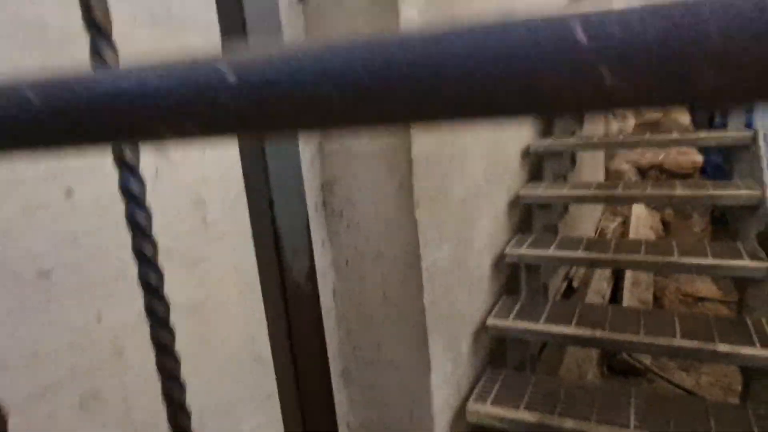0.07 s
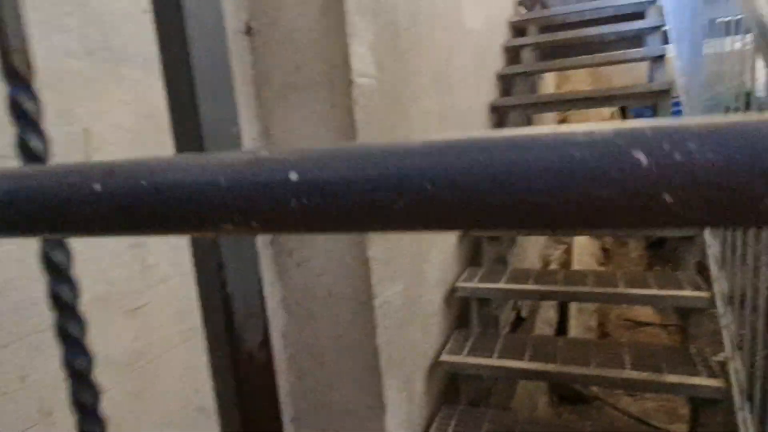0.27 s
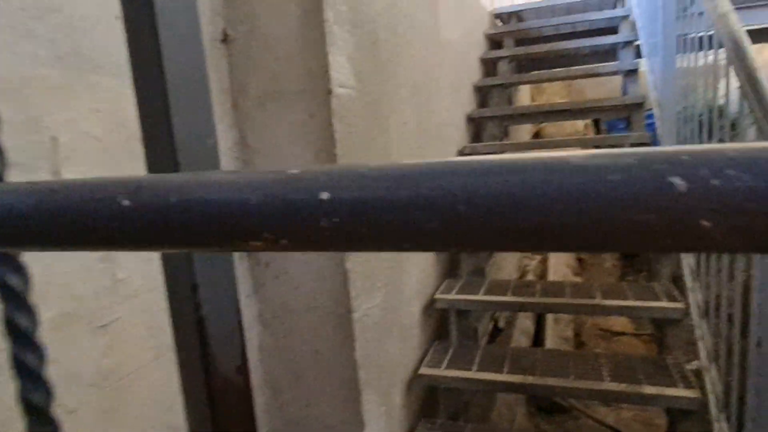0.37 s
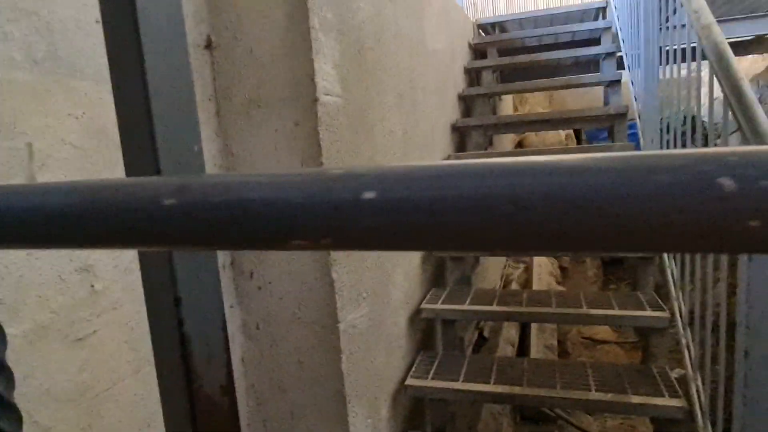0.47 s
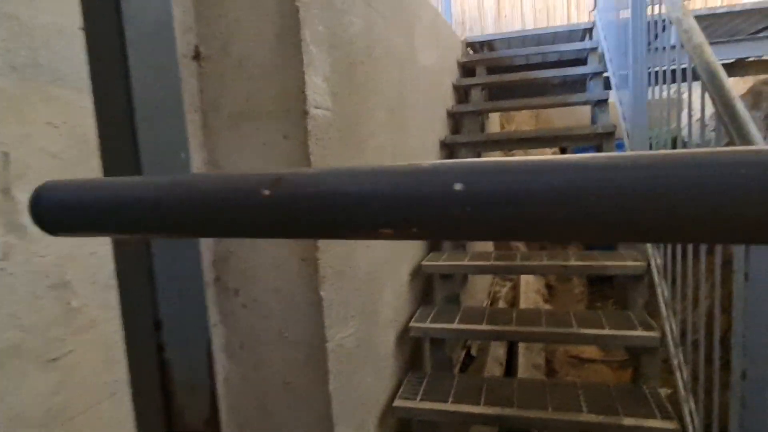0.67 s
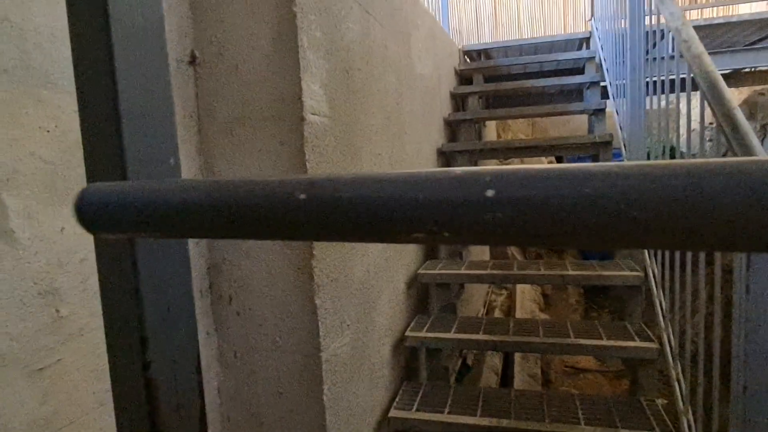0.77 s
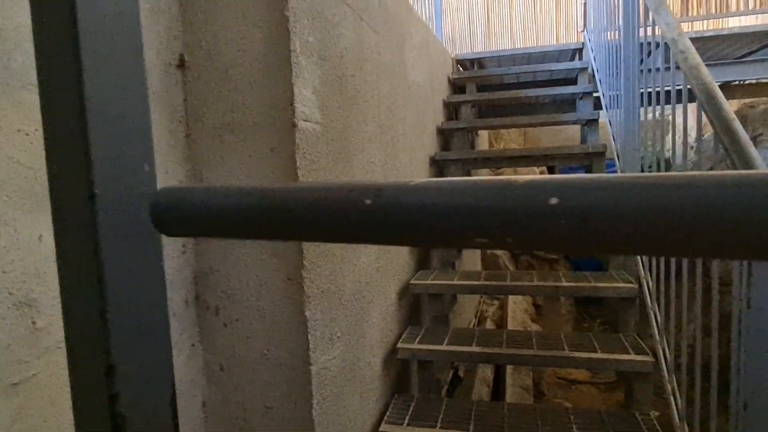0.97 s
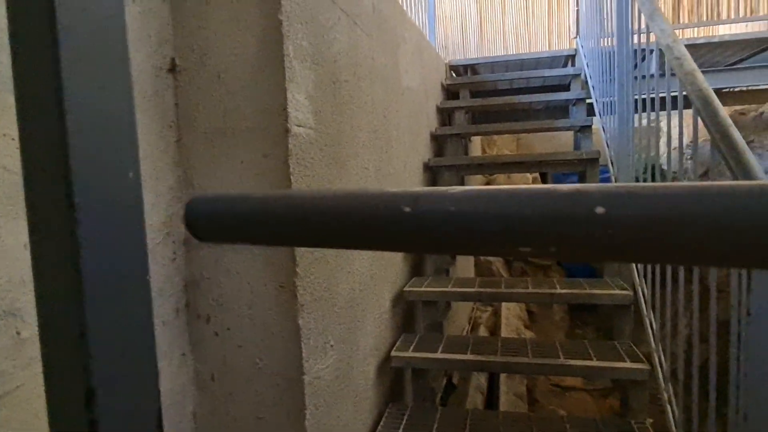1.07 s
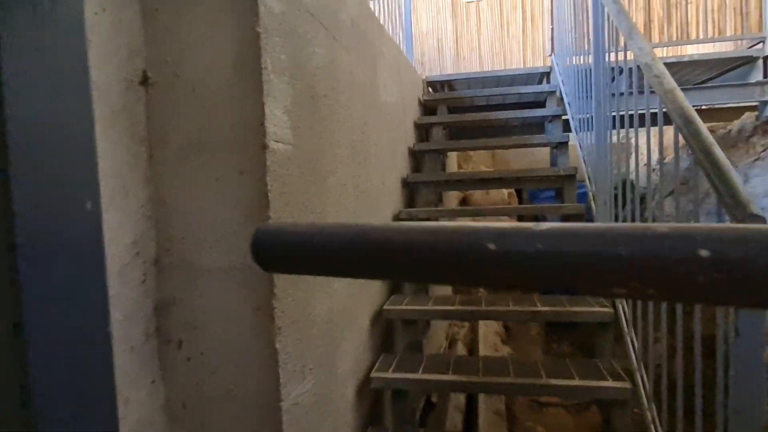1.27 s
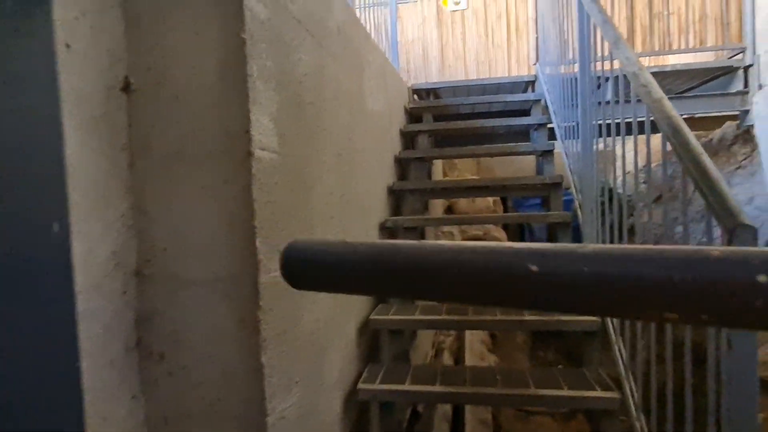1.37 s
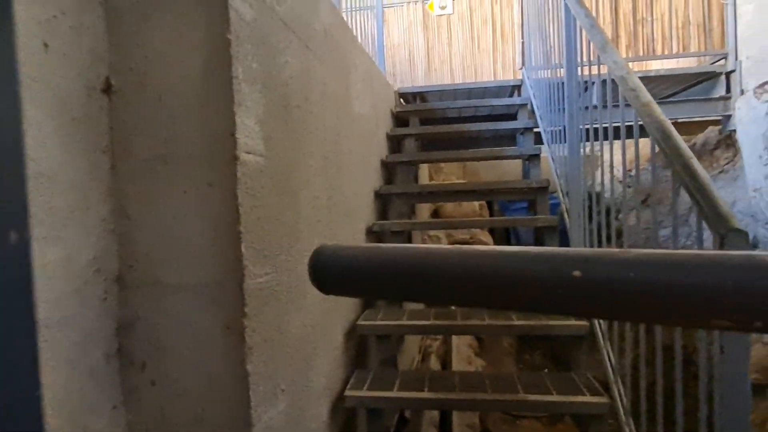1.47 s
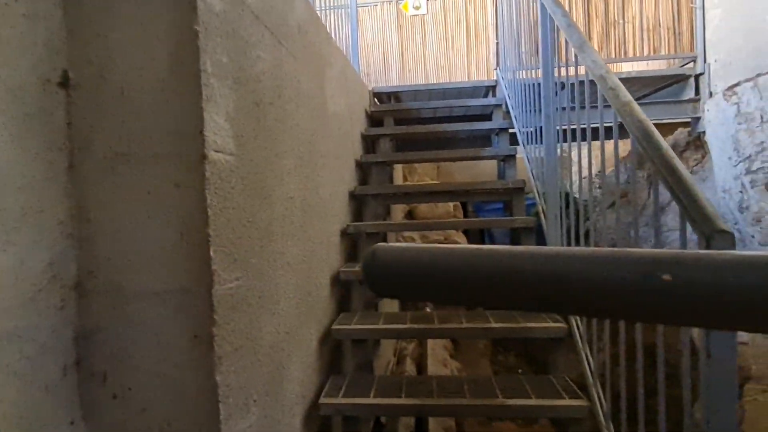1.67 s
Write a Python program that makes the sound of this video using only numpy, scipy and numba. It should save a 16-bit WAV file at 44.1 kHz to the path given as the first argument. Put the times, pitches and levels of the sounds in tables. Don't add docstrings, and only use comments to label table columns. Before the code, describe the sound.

Metallic footsteps on grated steel stairs. A previous step's thin ring is fading at the start; at about 0.2 s a shoe lands with a sharp clank, brief grating rattle and dense bright ringing, decaying over roughly a second. A second, similar clang with slightly different notes comes at 1.05 s. Concrete walls blur the tails; faint scuffs, including one near 1.25 s, soft wind bumps and low outdoor hum lie beneath.

```python
import sys
import numpy as np
from scipy import signal
from scipy.io import wavfile
from scipy.ndimage import uniform_filter1d
from numba import njit

SR = 44100
rng = np.random.default_rng(int(sys.argv[2]) if len(sys.argv) > 2 else 0)


def convert_level_to_amplitude(level_db):
    exponent = np.asarray(level_db, float) / 20
    return 10 ** exponent


def generate_wav(sig):
    pcm = np.round(np.clip(np.atleast_2d(sig).T, -1, 1) * 32767).astype(np.int16)
    wavfile.write(sys.argv[1], SR, pcm)


N = 74970

# start_s, level_db, rattle_hold_s, tread_number
LANDINGS = [
    (-.65, -8.5, 0.034, 2),
    (.1975, -14.5, 0.051, 0),
    (1.0465, -14.5, .055, 1),
]
# pitch_hz, left_db, right_db, ring_t60_s
FRAME_A = [(218, -62, -63, 2.0), (249, -56, -58, 2.0), (307, -46, -43, 1.6), (396, -45, -42, 1.4),
           (503, -41, -35, .75), (589, -49, -50, 2.0), (695, -38, -32, .8), (881, -42, -46, 2.0),
           (1244, -31, -27, 0.74), (1290, -38, -35, .8), (1382, -28, -20, 0.74), (1567, -20, -21, 0.68),
           (1651, -49, -48, 2.0), (1686, -33, -30, .9)]
FRAME_B = [(254, -54, -54, 2.0), (308, -51, -48, 2.0), (349, -57, -56, 2.0), (391, -46, -45, 2.0),
           (565, -42, -38, 1.0), (742, -51, -54, 2.0), (943, -49, -44, 2.0), (1610, -30, -28, .6),
           (1330, -27, -25, .3), (1245, -28, -29, .6), (1312, -33, -40, 1.61), (1420, -18, -14, .58),
           (1494, -29, -30, 0.79), (1585, -26, -28, 0.66)]
# pitch_hz, left_db, right_db, ring_t60_s
FRAME_C = [(285, -52, -49, 2.0), (307, -48, -45, 2.0), (490, -51, -49, 2.0), (587, -46, -44, 2.0),
           (637, -52, -50, 2.0), (803, -49, -47, 2.0), (1567, -51, -49, 2.0), (1663, -46, -43, 2.0),
           (4560, -62, -62, 2.0)]
BARS_C = [(1917, -39, -36, 2.0), (1944, -40, -37, 2.0), (1997, -49, -46, 2.0), (2100, -52, -47, 2.0),
          (2153, -53, -50, 2.0), (2638, -56, -52, 2.0), (2724, -53, -50, 2.0), (2912, -50, -45, 2.0),
          (2982, -46, -43, 2.0), (3015, -40, -37, 2.0), (3060, -47, -44, 2.0), (3101, -46, -43, 2.0),
          (3203, -58, -55, 2.0)]
# pitch_hz, left_db, right_db, ring_t60_s
BARS_A = [(1759, -33, -31, 1.26), (1834, -42, -29, .68), (1894, -48, -36, 1.46), (1945, -37, -32, 1.6),
          (1916, -45, -41, 2.0), (2095, -38, -31, 1.0), (2151, -31, -23, 1.2), (2258, -25, -16, .5),
          (2658, -38, -30, .88), (2776, -35, -39, 1.15), (2859, -28, -32, 0.89), (2982, -37, -37, 1.5),
          (3016, -38, -32, 1.33), (3073, -35, -31, 1.33)]
BARS_B = [(1780, -40, -36, 1.54), (1918, -45, -37, 2.0), (2011, -43, -42, 2.0), (2020, -40, -40, 1.4),
          (2100, -37, -22, 0.62), (2151, -38, -28, 1.1), (2248, -25, -23, .6), (2522, -32, -23, 0.58),
          (2777, -41, -32, 1.2), (2818, -36, -29, 1.4), (2859, -36, -30, 0.91), (2921, -28, -27, 0.71),
          (3017, -39, -36, 1.74), (3105, -32, -32, 1.04)]
# pitch_hz, left_db, right_db, ring_t60_s
BRACES_A = [(2606, -49, -45, 2.0), (2633, -41, -32, .9), (2818, -41, -36, 2.0), (4011, -26, -26, .26),
            (2522, -33, -29, .7), (4743, -26, -25, .45), (5752, -25, -25, .36), (5938, -26, -26, .42),
            (5981, -27, -27, .4), (6099, -31, -31, .55), (6481, -35, -35, .5), (4560, -42, -42, .8)]
BRACES_B = [(398, -38, -36, .35), (479, -34, -33, .2), (670, -30, -28, .15), (990, -25, -28, .16),
            (1015, -40, -36, .8), (1686, -30, -28, .8), (2213, -30, -28, .5), (2633, -33, -26, .6),
            (3030, -36, -33, 1.0), (4565, -37, -37, .75), (4899, -34, -34, .5), (5394, -31, -31, .36),
            (6029, -31, -31, .43), (6132, -28, -28, .3)]
RODS_HZ = [2372, 6289, 6810, 7150, 7355, 7387, 7443, 7482, 7698, 7786, 7870, 8003, 8104]
RODS_DB = [-21.5, -20, -27.5, -35.5, -26.5, -26, -24, -28.5, -26.5, -37, -34.5, -34.5, -42.5]
RODS_T60_S = [.3, .4, .2, .3, .28, .3, .25, .22, .55, .35, .35, .3, .3]
# pitch_hz, level_db
CROWD_LOW = [(180, -39), (650, -17), (1400, -4.5), (2300, -6), (3100, -8.5), (3400, -9.5), (6000, -8.5),
             (6900, -7), (7600, -1)]
CROWD_HIGH = [(7600, -0.5), (8120, -6.5), (8300, -22), (8900, -12.5), (10000, -21), (11500, -11),
              (13000, -22.5), (14600, -11)]
# pitch_hz, ring_t60_s
RING_LOW = [(200, 2), (700, 1.12), (1300, 0.75), (1950, 0.85), (2450, 0.54), (3050, 1.17), (3300, 0.55),
            (4600, 0.49)]
RING_HIGH = [(4600, 0.41), (5600, 0.37), (7800, 0.32), (8500, 0.29), (16000, 0.15)]
# pitch_hz, left_minus_right_db
STEEL_PAN = [(200, -2), (600, 0), (2000, -5), (5000, 0.5), (7500, -8), (16000, 1)]
# pitch_hz, level_db
HUM = [(30, -27.5), (55, -19.5), (85, -16.5), (200, -12.5), (310, -2), (480, -10), (1000, -19), (2000, -19)]
# pitch_hz, side_share
HUM_SIDE = [(40, 0.62), (70, .45), (110, .1), (320, 0.15), (600, 1)]
# pitch_hz, left_minus_right_db
HUM_PAN = [(55, -11.5), (110, 0.5), (300, -2.0)]
# start_s (moment of the peak), level_db, rise_s (before it), fall_s (after it)
SCUFFS = [
    (.065, -68, 0.029, 0.021),
    (.18, -55.5, .015, 0.082),
    (.51, -62, 0.011, 0.024),
    (.95, -59, .012, 0.029),
    (1.25, -52.5, .015, 0.012),
    (1.47, -66, .015, 0.038),
    (1.63, -58, 0.028, .04),
]
# start_s (moment of the peak), level_db, length_s (rise and fall alike), pitch_hz
BUMPS = [
    (.44, -61, .07, 45),
    (1.15, -62, .08, 50),
    (1.655, -57, .04, 56),
    (.99, -58, .015, 330),
]

RING_LENGTH = int(2.4 * SR)
LAG_S = 0.000407


def curve(table, hz):
    points = np.array(table)
    return np.interp(np.log(hz), np.log(points[:, 0]), points[:, 1])


def two_part(low, high, hz):
    return np.where(hz < high[0][0], curve(low, hz), curve(high, hz))


def band(x, hz, width_hz):
    return signal.lfilter(*signal.iirpeak(min(hz, .45 * SR), hz / width_hz, fs=SR), x)


def unit(x):
    return x / np.sqrt(np.mean(x ** 2))


@njit
def ring(hz, t60, left, right, start, length):
    out = np.zeros((2, length))
    for m in range(len(hz)):
        turn = np.exp(2j * np.pi * hz[m] / SR - np.log(1000) / (t60[m] * SR))
        z = 1. + 0j
        for i in range(start[m], min(length, int(1.2 * t60[m] * SR) + start[m])):
            out[0, i] += (left[m] * z).imag
            out[1, i] += (right[m] * z).imag
            z *= turn
    return out


def two_microphones(hz, db, pan_db, alike, luck):
    alike = np.clip(alike, 0, 1)
    shared, other = np.exp(2j * np.pi * luck[:, 0]), np.exp(2j * np.pi * luck[:, 1])
    delay = np.exp(-2j * np.pi * hz * LAG_S * np.clip(hz / 1300, 0, 1) ** 2)
    left = np.sqrt(alike) * shared * delay + np.sqrt(1 - alike) * other
    return convert_level_to_amplitude(db + pan_db / 2) * left, convert_level_to_amplitude(db - pan_db / 2) * shared


def rattle(hold_s):
    rise_s, release_s = 0.0013, 0.0095
    t = np.arange(int(.2 * SR)) / SR
    release = 1 + np.exp(np.clip((t - hold_s) / release_s, -30, 30))
    shape = (1 - np.exp(-t / rise_s)) / release
    clicks = rng.standard_normal((2, len(t))) * convert_level_to_amplitude(1.8 * rng.exponential(size=len(t)))
    return convert_level_to_amplitude(-4) * band(shape * unit(clicks), 3800, 10000)


def crowd(hold_s):
    count, lowest_hz, highest_hz = 1700, 160, 16200
    luck, scatter = rng.random((count, 4)), rng.standard_normal((count, 2))
    place = (np.arange(count) + luck[:, 2]) / count
    hz = lowest_hz + (highest_hz - lowest_hz) * place ** 1.5
    t60 = two_part(RING_LOW, RING_HIGH, hz) * np.exp(0.42 * np.tanh(scatter[:, 1]))
    db = -21 + two_part(CROWD_LOW, CROWD_HIGH, hz) + 2.5 * scatter[:, 0]
    start = ((.002 + hold_s * luck[:, 3] ** 2.2) * SR).astype(np.int64)
    alike = 0.054 + np.exp(-(hz / 330) ** 4)
    left, right = two_microphones(hz, db, curve(STEEL_PAN, hz), alike, luck)
    return ring(hz, t60, left, right, start, RING_LENGTH)


def clank(t):
    side = convert_level_to_amplitude(np.array([[-9.], [0]]))
    note = convert_level_to_amplitude(1) * np.sin(2 * np.pi * 2290 * t) * convert_level_to_amplitude(-60 * t / .045)
    return side * note * (1 - np.exp(-t / 0.0029))


def tread(number):
    lines_db, low_lines_db, twin_db, split_hz, swell_s = 15, 4, -9.5, 5.496, 0.0074
    parts = ((FRAME_A, BARS_A, BRACES_A), (FRAME_B, BARS_B, BRACES_B), (FRAME_C, BARS_C))[number]
    own_hz, left_db, right_db, own_t60 = np.vstack(parts).T
    hz, t60 = np.r_[own_hz, RODS_HZ], np.r_[own_t60, RODS_T60_S]
    slow_frame = (hz < 1000) * (t60 > 1.5)
    db = np.r_[(left_db + right_db) / 2, RODS_DB] + lines_db + low_lines_db * slow_frame
    pan_db = np.r_[left_db - right_db, curve(STEEL_PAN, np.array(RODS_HZ))]
    luck = rng.random((3 * len(hz), 3))
    twin = np.repeat([0, -1, 1], len(hz))
    hz, t60, db, pan_db = (np.tile(v, reps=3) for v in (hz, t60, db, pan_db))
    hz = hz + twin * split_hz * (0.29 + luck[:, 2]) * np.sqrt(hz / 2000)
    alike = np.where(twin, .2, np.where(hz < 450, .97, .7))
    left, right = two_microphones(hz, db + twin_db * np.abs(twin), pan_db, alike, luck)
    lines = ring(hz, t60, left, right, 0 * twin, RING_LENGTH)
    t = np.arange(RING_LENGTH) / SR
    return lines * (1 - np.exp(-t / swell_s)) + clank(t)


def walls(x):
    t60_s, delay_s, top_hz = 0.56, 0.0035, 5640
    t = np.arange(SR) / SR
    echo = band(rng.standard_normal((2, SR)), top_hz / 4, top_hz) * convert_level_to_amplitude(-60 * t / t60_s)
    echo = echo * (1 - np.exp(-(t / delay_s) ** 2))
    echo = echo / np.linalg.norm(echo[0])
    return x + convert_level_to_amplitude(-14) * signal.fftconvolve(x, echo, axes=1)[:, :x.shape[1]]


def landings():
    lead = SR
    near, wide = np.zeros((2, N + 4 * SR)), np.zeros((2, N + 4 * SR))
    for start_s, db, hold_s, number in LANDINGS:
        at = lead + int(start_s * SR)
        crash = rattle(hold_s)
        wide[:, at:at + RING_LENGTH] += convert_level_to_amplitude(db) * crowd(hold_s)
        wide[:, at:at + crash.shape[1]] += convert_level_to_amplitude(db) * crash
        near[:, at:at + RING_LENGTH] += convert_level_to_amplitude(db) * tread(int(number))
    return (walls(wide) + near)[:, lead:lead + N]


def walk(rate_hz):
    k = int(SR / rate_hz)
    stairs = np.repeat(rng.standard_normal(N // k + 1), k)
    return unit(uniform_filter1d(uniform_filter1d(stairs, k), k)[:N])


def narrow_noise(hz, width_hz):
    return unit(band(band(rng.standard_normal(N), hz, width_hz), hz, width_hz))


def outdoors():
    out, slow = 0, walk(0.35)
    for hz in 30 * 2 ** np.arange(0, 6.3, .5):
        mid, side = narrow_noise(hz, hz / 2), narrow_noise(hz, hz / 2)
        db = curve(HUM, hz) + 10 * np.log10(hz) + 2.1 * slow + 0.87 * walk(31)
        pan_db = curve(HUM_PAN, hz) * np.array([[.5], [-.5]])
        late = np.roll(mid, int(0.0024 * SR * (hz < 70)))
        both = np.array([late, mid]) + curve(HUM_SIDE, hz) * side * np.array([[1], [-1]])
        out = out + convert_level_to_amplitude(db + pan_db) * both
    hiss = rng.standard_normal((2, N))
    for _ in range(3):
        hiss = band(hiss, 5200, 4000)
    return convert_level_to_amplitude(-50) * unit(out) + convert_level_to_amplitude(-74.5) * unit(hiss)


def swell(start_s, rise_s, fall_s):
    t = np.arange(N) / SR - start_s
    return np.where(t < 0, np.exp(-(t / rise_s) ** 2), np.exp(-np.abs(t) / fall_s))


def scuffs():
    grit = rng.standard_normal((2, N)) * convert_level_to_amplitude(0.89 * rng.exponential(size=N))
    grit = unit(band(grit, 6500, 5000))
    grit = grit + convert_level_to_amplitude(-32) * unit(band(grit, 12000, 6000))
    return grit * sum(convert_level_to_amplitude(db) * swell(s, rise, fall) for s, db, rise, fall in SCUFFS)


def bumps():
    out = 0
    for start_s, db, length_s, hz in BUMPS:
        out = out + convert_level_to_amplitude(db) * swell(start_s, length_s, length_s) * narrow_noise(hz, 0.24 * hz)
    return convert_level_to_amplitude(np.array([[-4.], [1.5]])) * out


def scene():
    return landings() + outdoors() + scuffs() + bumps()


def top_cut(x):
    return signal.sosfilt(signal.butter(12, 16290, fs=SR, output="sos"), x)


def record(dry):
    rounded = dry / (1 + (dry / 1.05) ** 6) ** (1 / 6)
    mix = signal.sosfilt(signal.ellip(12, .2, 90, 16000, fs=SR, output="sos"), rounded)
    return top_cut(mix)


dry = scene()
out = record(dry)
generate_wav(out)
```